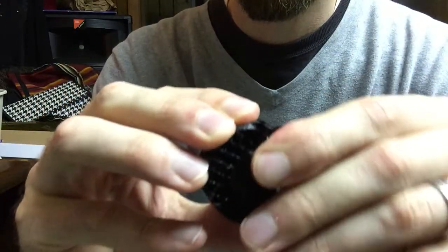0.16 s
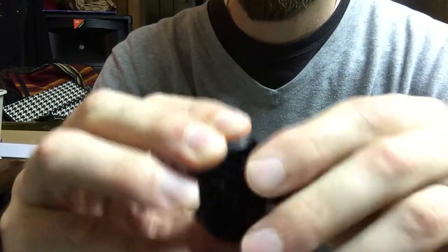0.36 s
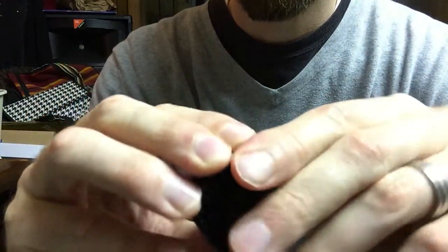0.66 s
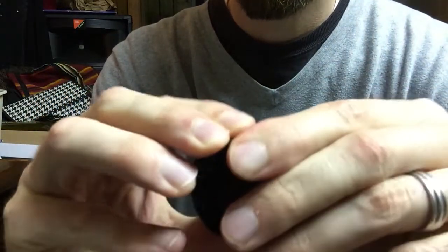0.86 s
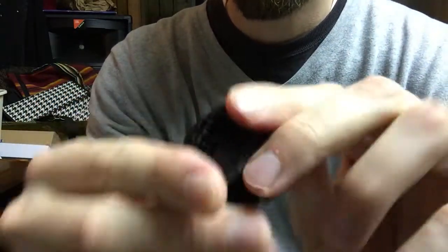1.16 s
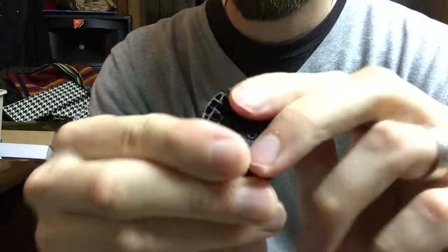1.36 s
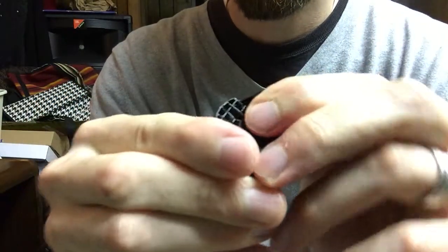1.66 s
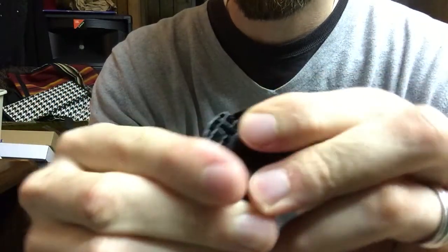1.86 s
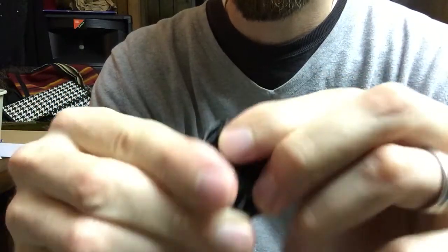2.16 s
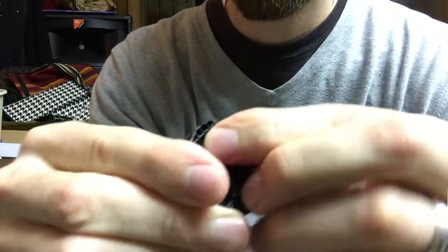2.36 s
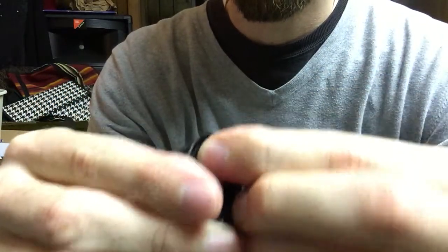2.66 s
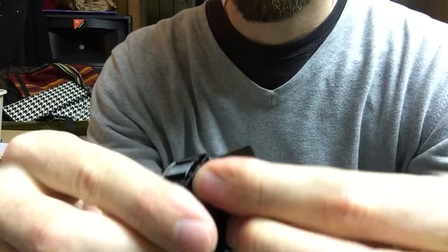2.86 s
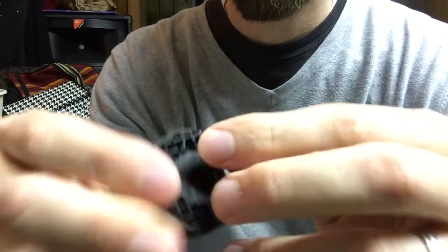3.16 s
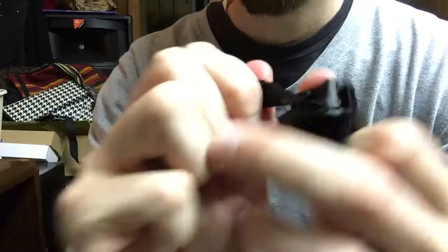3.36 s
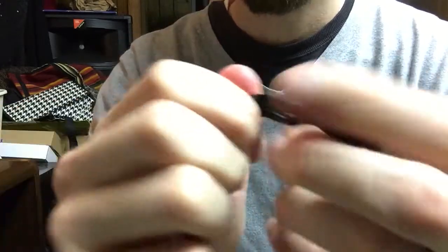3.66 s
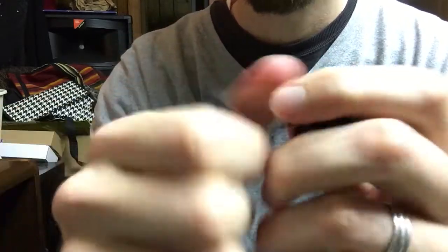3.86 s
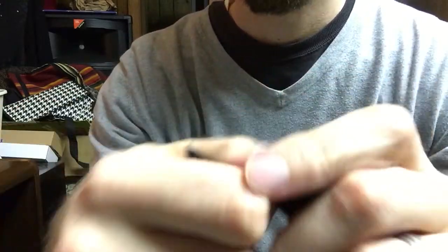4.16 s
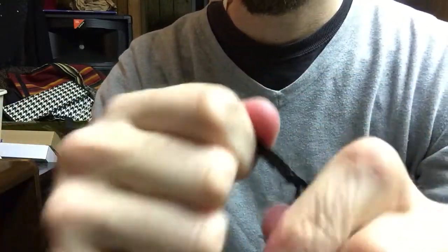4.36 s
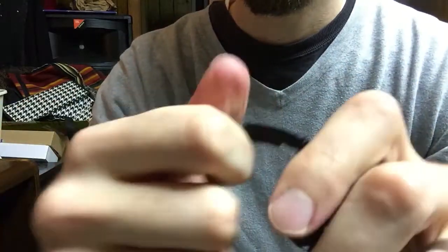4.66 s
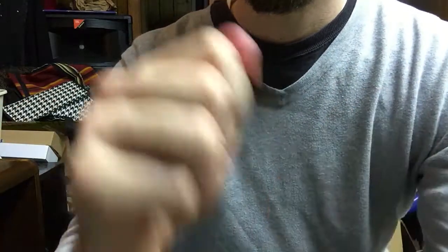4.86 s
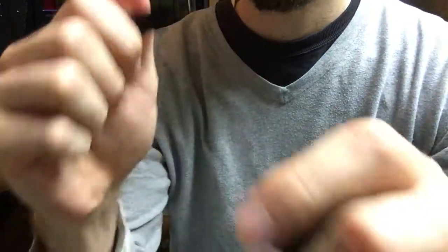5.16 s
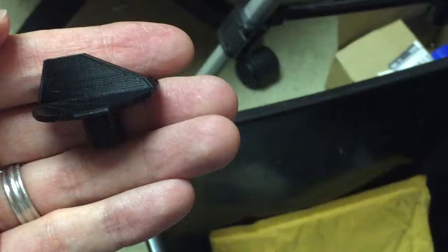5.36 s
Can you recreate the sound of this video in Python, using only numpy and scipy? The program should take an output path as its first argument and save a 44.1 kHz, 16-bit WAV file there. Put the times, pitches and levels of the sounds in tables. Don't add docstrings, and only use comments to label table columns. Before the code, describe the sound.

Close to a phone microphone in a small quiet room, fingers break brittle plastic supports off a small part. Light ticks and crackles grow into sharp snaps, pause, then return as a hard cluster and one very loud double crack. A faint fan whines behind. At the end the shot cuts abruptly to a louder low motor hum.

```python
import sys
import numpy as np
from scipy import signal
from scipy.fft import rfft, irfft, next_fast_len
from scipy.io import wavfile
from scipy.ndimage import uniform_filter1d

SR = 44100
rng = np.random.default_rng(int(sys.argv[2]) if len(sys.argv) > 2 else 0)


def file_out(sig):
    cols = np.atleast_2d(sig).T
    lim = np.clip(cols, -1, 1)
    pcm = np.round(lim * 32767).astype(np.int16)
    wavfile.write(sys.argv[1], SR, pcm)


def invert_db(x):
    u = np.asarray(x, float) / 20
    return 10 ** u


N = 243873
CUT_S, RESUME_S = 5.4125, 5.4366

GRAIN, LEAD_S = 1024, 0.002
GRAIN_HZ = np.fft.rfftfreq(GRAIN, 1 / SR)
SINCE_ONSET_MS = np.maximum(np.arange(GRAIN) / SR - LEAD_S, 0) * 1000


def columns(table):
    return (column[:, None] for column in np.transpose(table))


def resonance(freqs, hz, width_hz):
    s = 1j * freqs
    return s * width_hz / (s ** 2 + s * width_hz + hz ** 2)


def unit(x):
    return x / np.sqrt(np.sum(np.abs(x) ** 2, axis=-1, keepdims=True))


def noise(shape_of, level_db):
    size = next_fast_len(N)
    response = shape_of(np.fft.rfftfreq(size, 1 / SR) + 1)
    shaped = irfft(rfft(rng.standard_normal(size)) * response, size)[:N]
    return unit(shaped) * np.sqrt(N) * invert_db(level_db)


def coloured(spectrum, level_db):
    hz, per_hz_db = np.transpose(spectrum)
    return noise(lambda f: invert_db(np.interp(np.log(f), np.log(hz), per_hz_db)), level_db)


def walk(rate_hz):
    window = int(SR / rate_hz)
    x = uniform_filter1d(uniform_filter1d(rng.standard_normal(N), window), window)
    return x / x.std()


# pitch_hz, level_db
FAN_TONES = [
    (3303, -73),
    (3853, -72.5),
]


def fan_tones():
    speed_up_per_s, waver = 0.0011, 0.0028
    speed = 1 + speed_up_per_s * np.arange(N) / SR + waver * walk(3.6)
    turns = np.cumsum(speed) / SR
    total = 0
    for hz, level_db in FAN_TONES:
        total = total + np.sqrt(2) * invert_db(level_db + 2.0 * walk(10)) * np.sin(2 * np.pi * hz * turns)
    return total


# pitch_hz, density_db_per_hz
AIR_SPECTRUM = [(35, -45.5), (70, -5), (110, -15), (160, -12.5), (370, -21.5), (1200, -21.5), (1900, -16),
                (2650, -27), (3600, -35), (4300, -35.5), (5000, -29.5), (8000, -31.5), (12500, -42),
                (16000, -62)]
# pitch_hz, width_hz, level_db
FAN_WHINE = [
    (77.5, 36, -77),
    (607, 59, -80.5),
    (2200, 27, -80.5),
    (3290, 300, -70.5),
    (3650, 260, -76),
    (4020, 130, -71),
    (4400, 170, -84.5),
]


def room_tone():
    whine = 0
    for hz, width_hz, level_db in FAN_WHINE:
        whine = whine + noise(lambda f: resonance(f, hz, width_hz) * resonance(f, hz, 3 * width_hz), level_db)
    air = coloured(AIR_SPECTRUM, -68.5) * invert_db(0.31 * walk(9.7))
    return air + whine * invert_db(2.3 * walk(11.0)) + fan_tones()


def breaks(length_ms, spiky=0.78, rise_ms=0.049, fall=0.55, squareness=1.13):
    chance = rng.standard_normal((len(length_ms), 2, GRAIN))
    rise = 1 - np.exp(-SINCE_ONSET_MS / rise_ms)
    decay = np.exp(-(SINCE_ONSET_MS / (fall * length_ms[:, None])) ** squareness)
    cracks = chance[:, 0] * np.exp(spiky * chance[:, 1])
    burst = rfft(cracks * rise * decay)
    return burst / np.sqrt(uniform_filter1d(np.abs(burst) ** 2, size=40))


def through(burst, response):
    return unit(irfft(burst * response, GRAIN))


def lay(start_s, grains, lead_s=LEAD_S):
    out = np.zeros(N + grains.shape[1])
    start = np.maximum((start_s - lead_s) * SR, 0).astype(int)
    np.add.at(out, start[:, None] + np.arange(grains.shape[1]), grains)
    return out[:N]


# pitch_hz, width_hz, level_db
PART_MODES = [
    (1850, 570, 4),
    (2680, 260, 11),
    (2950, 950, 7),
    (4050, 354, 10),
    (5800, 990, -2.5),
    (7700, 290, 8.5),
    (9500, 7800, -0.5),
    (13580, 850, 8.5),
]


def part(f, count, scatter_db=3.5, plain_db=-6.0):
    spot = invert_db(scatter_db * rng.standard_normal((count, len(PART_MODES))))
    modes = []
    for k, (hz, width_hz, level_db) in enumerate(PART_MODES):
        modes.append((-1) ** k * invert_db(level_db) * resonance(f, hz, width_hz))
    return invert_db(plain_db) + spot @ np.array(modes)


def stiff(f, level_db, cut_hz=2000, octaves_per_db=0.25):
    s = 1j * f / (cut_hz * 2 ** (octaves_per_db * level_db))
    return (s / (1 + s)) ** 3


def ticks(start_s, level_db, pitch_hz, length_ms, breadth=1.4):
    hz = np.clip(pitch_hz, 500, 15000)[:, None]
    strand = resonance(GRAIN_HZ, hz, breadth * hz) ** 2
    lattice = part(GRAIN_HZ, len(start_s)) * stiff(GRAIN_HZ, np.maximum(level_db, -30)[:, None])
    burst = breaks(np.full(len(start_s), length_ms))
    return lay(start_s, invert_db(level_db)[:, None] * through(burst, strand * lattice))


# start_s, level_db
HANDLING_EFFORT = [
    (0.0, -68),
    (0.39, -87),
    (0.71, -62),
    (1.02, -74),
    (1.64, -71),
    (1.94, -81),
    (2.09, -63),
    (2.69, -84),
    (4.47, -80.5),
    (5.4, -78),
]


def rustle(count=2500):
    where, size, pitch = rng.random((count, 3)).T
    start_s = where * CUT_S
    effort_db = np.interp(start_s, *np.transpose(HANDLING_EFFORT))
    level_db = effort_db + 10 - 3 * np.log(size + 0.05)
    return ticks(start_s, level_db, 8000 * 2 ** (1.4 * (pitch - 0.5)), 0.8)


def even(x, size):
    spectrum = rfft(x)
    flat = irfft(spectrum / np.sqrt(uniform_filter1d(np.abs(spectrum) ** 2, size=size)), len(x))
    return flat * np.clip(np.linspace(4, -1, len(x)), 0, 1)


# t60_s, level_db, darkening_hz
REFLECTIONS = [
    (0.037, -15, 10280),
    (0.159, -23.5, 7740),
]


def surroundings(x, thin_hz=3500):
    t = np.arange(SR // 3) / SR
    tail = 0
    for t60_s, level_db, dark_hz in REFLECTIONS:
        decay = np.exp(-np.log(1000) * t / t60_s)
        build_up = 1 - np.exp(-t / 0.0048)
        fading = even(rng.standard_normal(len(t)) * decay * build_up, size=80)
        tail = tail + invert_db(level_db) * unit(signal.lfilter(*signal.butter(1, dark_hz, fs=SR), fading))
    thinned = signal.lfilter(*signal.butter(1, thin_hz, "high", fs=SR), tail)
    return signal.fftconvolve(x, thinned)[:N]


# start_s, level_db, pitch_hz
LOOSE_STRANDS = [(0.0091, -24, 11500), (0.095, -38, 10800.0), (0.1033, -20.5, 11300), (0.1309, -33, 9300.0),
                 (0.147, -25.5, 7400), (0.179, -14, 11300), (0.288, -31, 8000), (0.3626, -35, 10300.0),
                 (0.3905, -27, 11600.0), (0.418, -40, 10100.0), (0.4316, -20, 4670), (0.5136, -19, 6860),
                 (0.537, -16, 6800), (0.541, -24, 6500.0), (0.545, -20, 7100), (0.5724, -28, 6800.0),
                 (0.58, -27, 6400.0), (0.5844, -17.5, 6550), (0.588, -22, 9000.0), (0.612, -17, 8150),
                 (0.62, -21, 6900), (0.6342, -20, 7850), (0.7537, -28, 9800.0), (0.801, -25, 9900),
                 (0.8144, -26.0, 11200.0), (0.823, -25, 10900.0), (0.858, -25, 11800.0), (0.884, -19, 9500.0),
                 (0.9156, -25, 10600), (1.243, -30, 6500),
                 (1.3466, -38, 9900.0), (1.3636, -43, 10620), (1.391, -25.5, 7200), (1.449, -29, 4950),
                   (1.4527, -36, 7880), (1.463, -26, 7250), (1.4773, -22, 4980), (1.4896, -20, 6400),
                   (1.4966, -23, 6530), (1.502, -19, 6470), (1.506, -24, 9900.0), (1.5096, -28, 10500.0),
                   (1.5597, -16, 6300.0), (1.5773, -24, 8130), (1.6691, -20, 8980), (1.737, -30, 7000.0),
                   (1.7583, -21, 10600), (1.7807, -38, 13800.0), (1.906, -21, 9300), (1.924, -23, 9970),
                   (1.9475, -34.5, 11200.0), (1.9656, -18.5, 11960), (1.9708, -20.5, 5740),
                   (1.986, -27.5, 12700), (2.07, -30, 6500.0), (2.1223, -22, 12560), (2.131, -23.5, 5320),
                   (2.1439, -20.5, 9100.0), (2.222, -31, 4000), (2.481, -33.5, 10000),
                 (3.085, -32, 7900), (3.1046, -21, 6340), (3.1515, -31, 6600.0), (3.1616, -32.5, 6460),
                 (3.1733, -28.5, 11840), (3.3793, -35.5, 6800), (3.463, -16.5, 9700), (3.4772, -20, 5800.0),
                 (3.504, -30.5, 7530), (3.534, -31.5, 6600.0), (3.5684, -19, 3650), (3.6857, -34.5, 9100),
                 (3.6963, -21.5, 8200), (3.7647, -34, 6570), (3.8651, -28, 9500), (3.893, -24.5, 8000),
                 (3.9318, -23, 3700), (4.0453, -24.5, 5360), (4.155, -26.5, 6800), (4.2146, -25, 3180),
                 (4.2214, -27, 8200.0), (4.2346, -24, 7200.0), (4.236, -28.5, 13100),
                 (4.2494, -27.5, 6400.0), (4.2757, -22, 4730), (4.5784, -38, 10100), (4.7686, -32, 8700.0),
                 (4.8, -24.5, 5060), (4.8045, -19.5, 4400), (5.0048, -24, 7100.0)]


def strands():
    return ticks(*np.transpose(LOOSE_STRANDS), 0.64)


# start_s, level_db, pitch_hz
FAINT_STRANDS = [(0.0958, -39, 11600), (0.1233, -45, 12500), (0.1421, -45, 12100),
                 (0.1566, -41, 9900), (0.2047, -49, 11000), (0.2229, -49, 8600), (0.2603, -50, 10700),
                 (0.263, -46, 12400), (0.2653, -37, 10700), (0.3815, -39, 9700), (0.3935, -41, 10600),
                 (0.419, -36, 10500), (0.426, -28, 11600), (0.4277, -30, 11100), (0.4926, -42, 7000),
                 (0.5098, -27, 8600), (0.6882, -33, 9900), (0.7043, -36, 11500), (0.756, -37, 12300),
                 (0.7946, -42, 11300), (0.818, -33, 11000), (0.907, -31, 8400), (0.9296, -43, 6800),
                 (0.9949, -47, 8800), (1.097, -46, 11700), (1.1054, -39, 12700), (1.1954, -44, 7900),
                 (1.2261, -38, 5900), (1.2376, -40, 7000), (1.2454, -24, 9400), (1.2728, -35, 6900),
                 (1.2759, -39, 7800), (1.3072, -47, 8500), (1.3478, -30, 11800), (1.3765, -42, 7700),
                 (1.385, -36, 6400), (1.4037, -52, 9600), (1.456, -34, 3800), (1.6096, -19, 10200),
                 (1.639, -30, 6500), (1.7863, -50, 13700), (1.7888, -38, 13800), (1.7977, -45, 8400),
                 (1.8428, -45, 8600), (1.9084, -36, 11000), (1.9286, -38, 11500), (1.942, -40, 10800),
                 (1.948, -32, 11800),
                 (1.9822, -32, 14000), (2.0035, -41, 11600), (2.0254, -37, 10800), (2.0456, -33, 7600),
                      (2.082, -31, 7400), (2.1277, -35, 6800), (2.1379, -33, 9200), (2.323, -30, 10800),
                      (2.2145, -30, 10000), (2.4239, -40, 8800), (2.457, -41, 7440), (2.5028, -32.5, 2200),
                      (2.6777, -41, 9400), (2.7375, -37, 8960), (3.101, -41, 11300), (3.1411, -42, 8950),
                      (3.182, -44, 10700), (3.1985, -38.5, 6050), (3.3354, -42, 10200), (3.34, -44, 11100),
                      (3.4118, -35.5, 7100), (3.5409, -35, 6400), (3.7267, -38, 6600), (3.7662, -29, 6200),
                      (3.8843, -36, 7500), (3.941, -40, 5900), (3.952, -43, 5800), (3.9603, -46, 5900),
                      (3.9683, -44, 6000), (3.9709, -40, 5660), (3.9794, -50, 6000), (4.0186, -43, 6850),
                      (4.0253, -38, 6200), (4.169, -39.5, 9000), (4.174, -38, 10100), (4.2029, -40, 11200),
                      (4.2393, -27, 10200), (4.5475, -44, 7140), (4.6159, -41, 13100), (4.651, -36, 7200),
                      (4.6807, -41, 8200), (4.7105, -43, 8500), (4.7538, -45, 9100), (4.7616, -42, 9000),
                      (4.911, -44, 6500), (5.2829, -43, 13400), (5.3105, -44, 9700), (5.3166, -41, 7300)]


def faint_strands():
    return ticks(*np.transpose(FAINT_STRANDS), 0.56, breadth=0.92)


# start_s, level_db, sliver_pitch_hz, sizzle_db, thud_db
STRUT_BREAKS = [(0.1663, -12.5, 12700, 13, -52), (0.4354, -19, 3700, 2, -6.5),
                (0.5035, -28, 6300, -13, -40.0), (0.519, -10.5, 3770, -11, -37), (0.526, -18, 8600, -15, -24),
                (0.5552, -21.5, 6260, 2, -42), (0.6019, -13, 7340, 10, -23.5), (0.6514, -21.5, 6040, -7, -12),
                (0.6543, -6.5, 8440, 1, -38), (0.6594, -8.5, 4350, 0, -17.5), (0.6617, -19.5, 3600, 1, -15),
                (0.7209, -19, 4020, 12, -41), (0.7707, -21.5, 5700, 5, -20), (0.8069, -24.5, 6000, 7, -24),
                (0.8402, -16.5, 4020, 9, -35), (0.8624, -13, 7200, 5, -23), (0.8698, -11, 5500, 0.5, -25.5),
                (0.9883, -22.5, 3540, 9.5, -31), (1.246, -14.5, 5500, -12, -50),
                (1.3347, -16.5, 12100, 7, -36), (1.522, -3, 6500, 5, -28), (1.5354, 6.5, 3440, 4.5, -19),
                (1.5655, -20, 6330.0, 8, -21), (1.5944, -19, 3890, 7, -16),
                (1.6021, -3, 2870, -0.5, -16), (1.6223, -5.5, 3900, -21.5, -27),
                  (1.6286, -9, 6300, -18, -22), (1.6764, 5.5, 6400, 7, -18.5),
                  (1.6916, -14.5, 9100, -4, -24), (1.896, -20, 7100, 5, -31.5), (1.957, -20, 3970, -1, -22),
                  (2.0364, -16.5, 9500.0, 6, -42), (2.0982, -24, 4180, 7, -22),
                  (2.1494, -16, 6100, -8, -28), (2.1738, -16.5, 3170, 1, -25), (2.179, -18, 3080, -9, -9),
                  (2.184, -6, 3140, -3, -21.5), (2.203, -19, 2990, 3, -7.5),
                  (2.2286, -9.5, 7450, -5, -26.5), (2.243, -12, 3250, -3, -23.5),
                  (2.253, 3.5, 5800, -6, -42), (2.259, -10.5, 1850.0, -13, -10.5),
                  (2.3029, -0.5, 4400, 0, -31.5), (2.5176, 3, 4140, -1, -19.5),
                  (2.562, -18, 3800, 9.5, -17), (2.72, -17, 4230, -5, -29), (3.393, -19, 5900, -3, -45),
                  (3.43, -17, 9100, -14, -48),
                (3.4376, -13.5, 5370, -9, -42), (3.4903, -12, 9470.0, 3.5, -52),
                (3.557, -12, 5800, -6, -30), (3.6898, -18, 2870, 7.5, -10), (3.7047, 4, 2745, -2.5, -29),
                (3.9043, -17, 4930, -10, -41), (4.0375, -17.5, 6150, -6, -44), (4.1851, -15, 8480, -4, -24),
                (4.2944, 2, 3290.0, -11, -25.5), (4.3288, -1, 4030, 10.5, -15),
                (4.3335, 2, 4530, -10, -26.5), (4.3495, -8, 8200, 1, -27), (4.3512, -1.5, 2580, -9.5, -20),
                (4.3606, 1.5, 7140, -4, -12), (4.369, -5.5, 5270, 3.5, -10.5), (4.385, -9, 9200, 2, -21),
                (4.3896, -10, 5400, -6.5, -24), (4.4287, -8.5, 4400, -22, -15.5),
                (4.646, -20, 2900, -17, -24), (4.8313, -17.5, 2320, -15.5, -7), (4.8344, 9, 4020, -15, -18),
                (4.8428, 8.5, 4070, -1, -14.5), (4.846, 5.5, 7260, -10.5, -15.5),
                (5.3059, -22.5, 9400, 6.5, -33)]


def snaps():
    s, level_db, ring_hz, sizzle_db, thud_db = columns(STRUT_BREAKS)
    f, start_s = GRAIN_HZ, s[:, 0]
    length_ms = 1.66 * np.exp(0.015 * level_db) * (4500 / ring_hz) ** 0.15
    burst = breaks(length_ms[:, 0])
    sliver = through(burst, resonance(f, ring_hz, 0.14 * ring_hz) * resonance(f, ring_hz, ring_hz))
    lattice_modes = part(f, len(s)) * stiff(f, level_db)
    lattice = through(burst, resonance(f, 5200, 8300) ** 2 * lattice_modes)
    sizzle_decay = np.exp(-SINCE_ONSET_MS / 0.57)
    sizzle = unit(sizzle_decay * through(burst, resonance(f, 15060, 8000) ** 3))
    thud = through(burst, resonance(f, 1084, 1900) ** 2)
    crumbling = breaks(np.full(len(s), 1.58), spiky=0.24, rise_ms=1.0, squareness=0.77)
    crumble = through(crumbling, resonance(f, 5200, 7000) ** 2)
    ringing = unit(sliver + invert_db(0.5) * lattice)
    near = ringing + invert_db(sizzle_db - 3.0) * sizzle + invert_db(thud_db + 2.0) * thud + invert_db(-8) * crumble
    crack = np.exp(-2j * np.pi * f * LEAD_S)
    broad = resonance(f, 4900, 8900) ** 2 + invert_db(-4) * resonance(f, ring_hz, ring_hz)
    far = through(crack, broad) + invert_db(sizzle_db - 6.5) * sizzle
    return lay(start_s, invert_db(level_db) * near), lay(start_s, invert_db(level_db) * far)


# start_s, level_db, pitch_hz
STUMP_TWANGS = [(0.1789, -9.5, 11700), (0.5036, -18, 6170), (0.5261, -11.5, 9100), (0.5542, -11, 6900),
                (0.602, -15, 7250), (0.6526, -10.5, 10800), (0.6545, -9.5, 7340), (0.6594, -10, 7900),
                (0.6614, -26, 5560), (0.807, -19.5, 11800), (0.8406, -22, 9300), (0.8708, -20.5, 2220),
                (1.2469, -15.5, 4470), (1.5228, -8, 3880), (1.5358, -5.5, 4400), (1.5658, -19, 8870),
                (1.6009, -11, 3630), (1.6228, -8.5, 6350), (1.6283, -17, 6980), (1.6768, -1.5, 2970),
                (1.6918, -9.5, 9400), (1.9553, -15, 3960), (2.1225, -20, 12600), (2.1741, -14, 7300),
                (2.1794, -23, 2950), (2.1842, -29, 3130), (2.202, -20, 3050), (2.2289, -18, 7240),
                (2.2433, -14, 3020), (2.254, -2, 4140), (2.2589, -17, 4050), (2.3033, -5, 5700),
                (2.5176, -2, 5070), (3.4303, -16, 8940), (3.4365, -25, 5540), (3.5574, -14, 8200),
                (3.697, -26, 5860), (4.1839, -15, 8460), (4.2354, -18, 13400), (4.2954, -5, 2650),
                (4.3146, -23, 5510), (4.3293, 2.5, 12700), (4.3334, -1.5, 5300), (4.3507, -15.5, 7320),
                (4.3603, -7, 2040), (4.368, -15, 5550), (4.3854, -10.5, 12600), (4.39, -10, 7920),
                (4.429, -13, 5200), (4.6466, -21, 4740), (4.8351, 6.5, 4310), (4.843, 4.5, 2700)]


def stumps():
    s, level_db, hz = columns(STUMP_TWANGS)
    push = breaks(np.full(len(s), 0.83))
    ring = resonance(GRAIN_HZ, hz, 0.12 * hz) * resonance(GRAIN_HZ, hz, 1.24 * hz)
    return lay(s[:, 0], invert_db(level_db) * through(push, ring))


# start_s, length_s, rate_hz, level_db (a strand), pitch_hz
PEEL_ROWS = [(0.415, 0.013, 600, -35, 8800), (0.578, 0.062, 227, -27.5, 6900),
             (1.506, 0.078, 190, -28, 6460), (1.6, 0.012, 1100, -29, 5960), (1.938, 0.044, 118, -33, 8450),
             (2.127, 0.062, 145, -29, 7000), (3.461, 0.023, 540, -30.5, 6400),
             (3.573, 0.028, 445, -29, 3140), (3.868, 0.057, 247, -32.5, 6700),
             (3.968, 0.0066, 250, -54, 5600), (4.168, 0.087, 143, -38.5, 7960),
             (4.298, 0.024, 530, -22.5, 4980), (4.544, 0.0075, 520, -39.5, 5970),
             (4.64, 0.022, 276, -33, 5170)]


def peeling(count=20):
    start_s, length_s, rate_hz, level_db, hz = columns(PEEL_ROWS)
    chance = rng.standard_normal((len(PEEL_ROWS), 2, count))
    interval_s = np.exp(0.69 * chance[:, 0]) / rate_hz
    late_s = np.cumsum(interval_s, axis=1) - interval_s[:, :1]
    ended = np.clip((late_s - length_s) * rate_hz, 0, 1)
    strand_db = level_db - 60 * ended
    strand_hz = hz * 2 ** (0.35 * chance[:, 1])
    return ticks((start_s + late_s).ravel(), strand_db.ravel(), strand_hz.ravel(), 0.36, breadth=1.0)


# start_s, level_db, pitch_hz, t60_ms
FINGER_KNOCKS = [(1.524, -25.5, 184, 18), (1.53, -27.5, 155, 120), (1.563, -26.5, 153, 36),
                 (1.674, -21, 108, 35), (2.279, -32, 142, 140), (2.316, -30, 154, 80),
                 (2.518, -7.5, 1240, 6.1), (2.8514, -36.5, 903, 26), (2.8505, -32.5, 1860, 22),
                 (3.431, -33, 1260, 77), (3.504, -23.5, 2970, 15), (3.7052, -21.5, 897, 22),
                 (3.932, -32, 1850, 38), (3.962, -27.5, 5800, 20), (4.156, -28, 2500, 12),
                 (4.331, -18.5, 253, 21), (4.359, -28.5, 161, 26), (4.6504, -35, 2630, 42),
                 (4.845, -15.5, 302, 26.9), (4.833, -30.5, 89, 17), (5.3063, -27, 1535, 10.5),
                 (0.722, -24.5, 1850, 11), (4.8352, 2, 1850, 4.5), (2.5187, -4.5, 3020, 8.7),
                 (3.439, -26.5, 2500, 12), (2.72, -34, 4980, 6.2), (2.8502, -36, 3200, 8),
                 (3.597, -25, 4160, 13)]


def knocks():
    s, level_db, hz, t60_ms = columns(FINGER_KNOCKS)
    t = np.arange(4 * GRAIN) / SR
    decay = np.exp(-np.log(1000) * t * 1000 / t60_ms)
    build_up = 1 - np.exp(-3 * hz * t)
    ring = np.sin(2 * np.pi * hz * t) * decay * build_up
    return lay(s[:, 0], invert_db(level_db) * unit(ring), lead_s=0)


# pitch_hz, density_db_per_hz
SHOP_SPECTRUM = [
    (30, -28),
    (160, -13.5),
    (450, -29.5),
    (570, -21),
    (920, -31.5),
    (1330, -26.5),
    (3370, -27.5),
    (5000, -37),
    (15300, -45),
    (16500, -71),
]


def second_shot():
    motor_hz, motor_db = 75.6, -42.5
    hum = np.sqrt(2) * np.sin(2 * np.pi * motor_hz * (np.arange(N) / SR - RESUME_S))
    return coloured(SHOP_SPECTRUM, -54) + hum * invert_db(motor_db + 1.8 * walk(24))


def scene():
    t = np.arange(N) / SR
    near, far = snaps()
    small = strands() + peeling() + rustle() + knocks()
    echoes = surroundings(far + small)
    first_shot = near + small + echoes + faint_strands() + stumps() + room_tone()
    fade_in = np.clip((t - RESUME_S) / 0.0016, 0, 1)
    return (first_shot * (t < CUT_S) + second_shot() * fade_in)[None]


def low_pass(x):
    return signal.sosfilt(signal.butter(12, 17140, fs=SR, output="sos"), x)


def record(dry):
    ceiling, chime_hz, chime_width_hz, top_hz = 0.68, 8080, 70, 16250
    rounded = dry / (1 + (np.abs(dry) / ceiling) ** 4) ** 0.25
    chime = signal.filtfilt(*signal.iirpeak(chime_hz, chime_hz / chime_width_hz, fs=SR), rounded)
    droop = signal.butter(2, 15000, fs=SR, output="sos")
    dull = signal.sosfilt(droop, rounded + invert_db(-8) * chime)
    finished = signal.sosfilt(signal.ellip(8, 0.3, 70, top_hz, fs=SR, output="sos"), dull)
    return low_pass(finished)


dry = scene()
out = record(dry)
file_out(out)
```